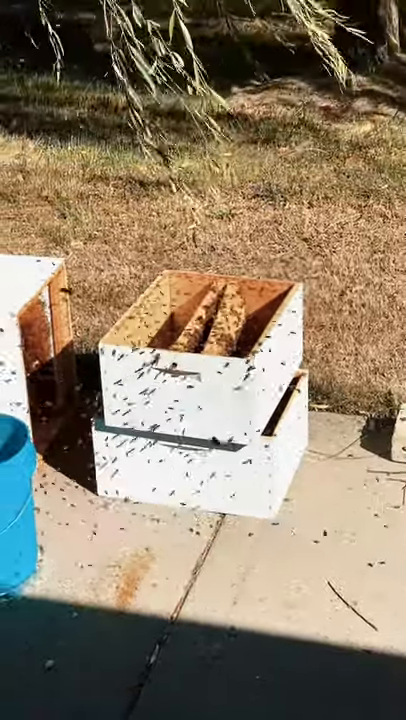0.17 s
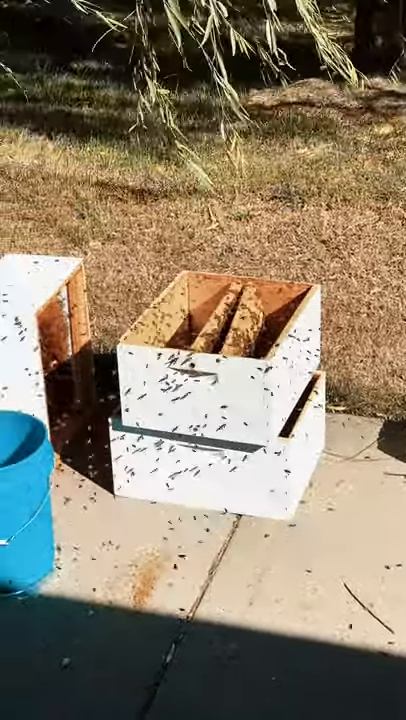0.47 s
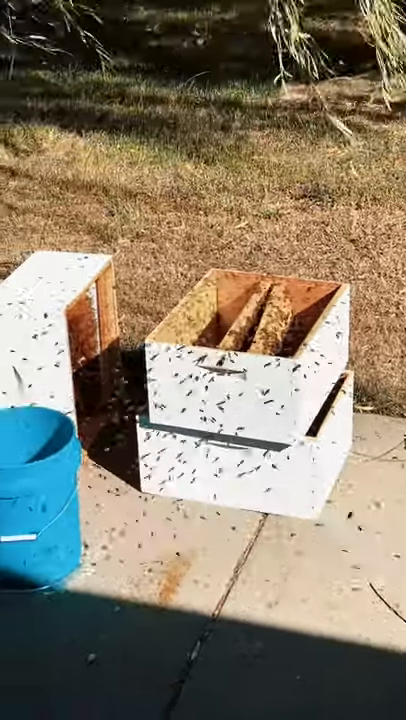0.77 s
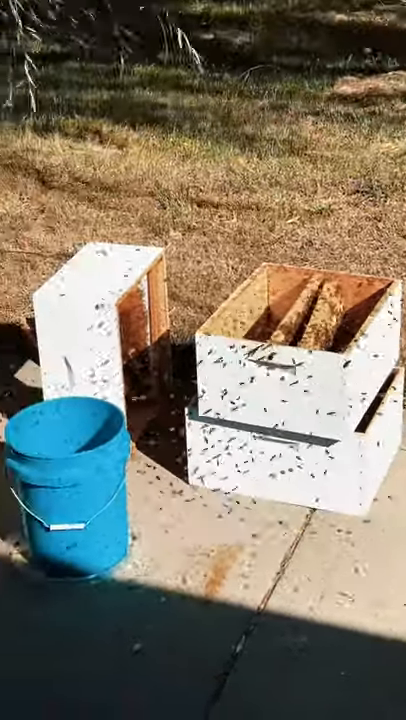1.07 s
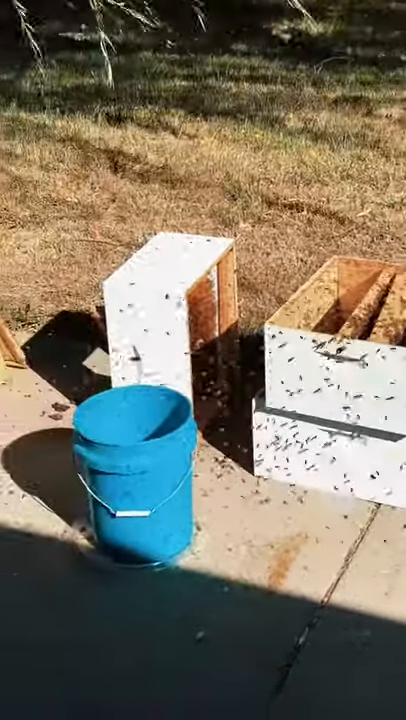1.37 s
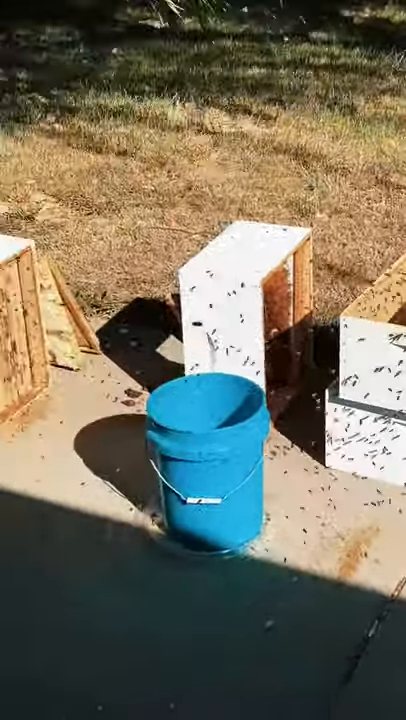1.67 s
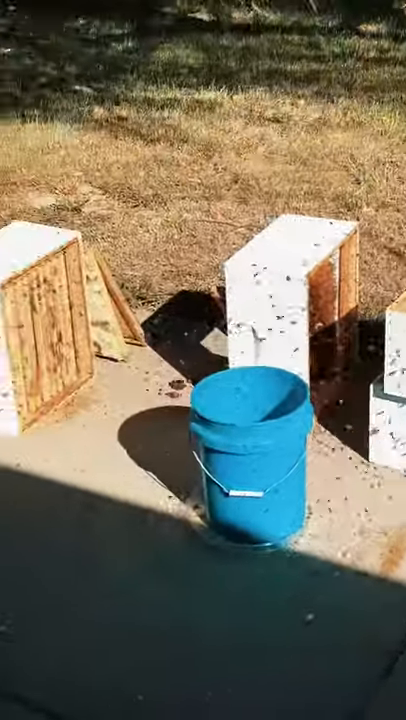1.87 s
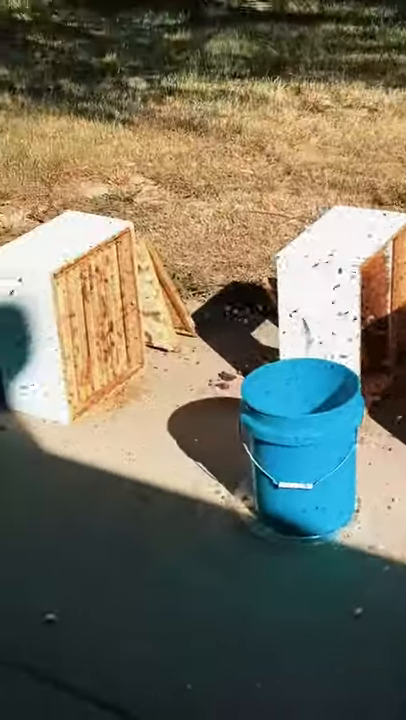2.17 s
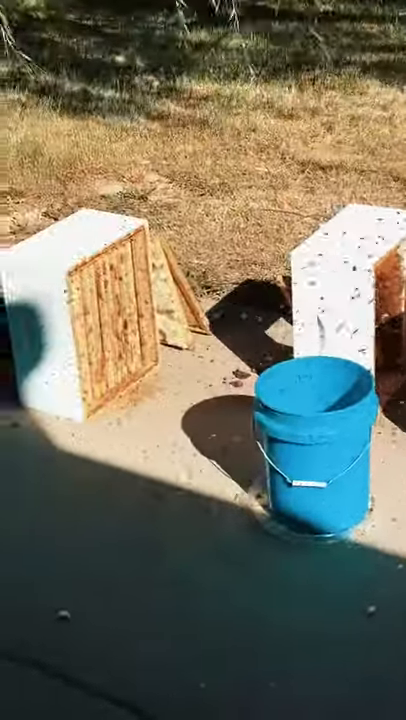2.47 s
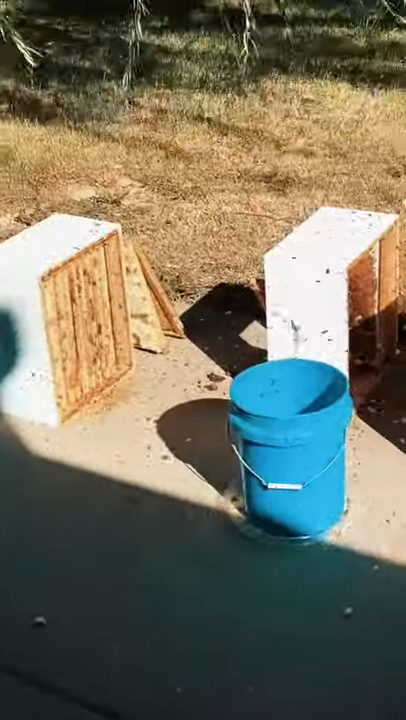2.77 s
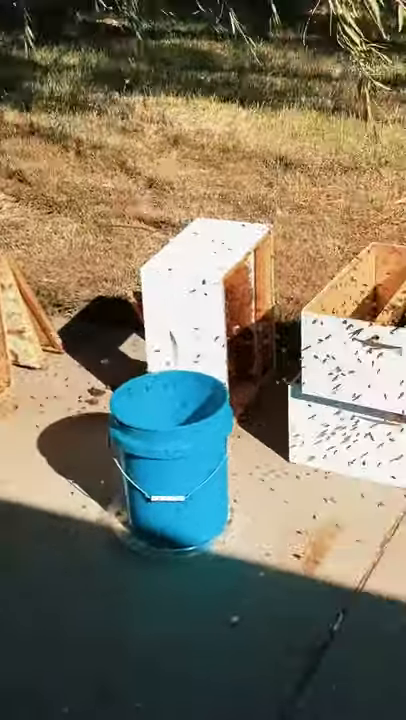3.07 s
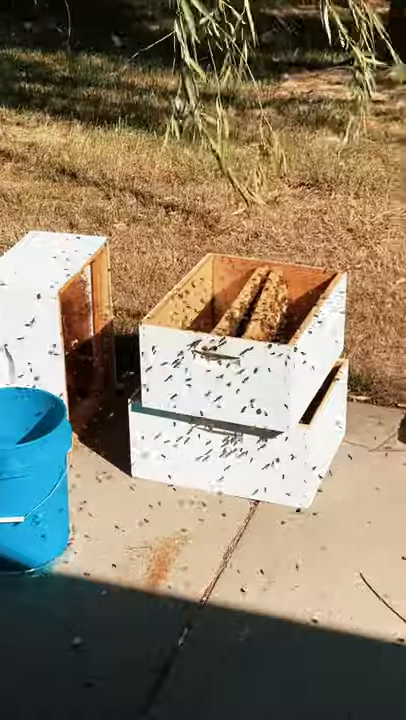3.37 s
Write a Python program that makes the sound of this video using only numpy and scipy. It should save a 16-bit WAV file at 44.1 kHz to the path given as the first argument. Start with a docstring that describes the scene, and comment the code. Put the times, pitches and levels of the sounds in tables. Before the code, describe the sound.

Many honeybees blend into a steady, low, slightly rough hum for about 3.5 seconds, each wavering in pitch. Single bees briefly swell and glide nearby; the nearest buzz grows more prominent from about 1.3 seconds and is strongest near the end. A soft outdoor hiss stays underneath. Low wind rumbles and thumps the microphone early, most strongly at 1.5-2.1, eases around 2.3-2.8, then returns from 2.9.

```python
"""A cloud of honeybees flies around an open hive in a yard: harmonic wingbeats near 255 Hz wander
and blend into one hum. From it the nearest bees swell and glide; a delayed copy of each wing tone
is its echo off the concrete below, which makes the harmonics come and go.
Behind them lies a steady outdoor hiss of coloured noise. Soft gusts rumble and flutter on the
microphone as noise of varying level, and single eddies thump it as brief tones falling in pitch."""
import sys
import numpy as np
from scipy.fft import rfft, irfft, next_fast_len
from scipy.io import wavfile
from scipy.ndimage import map_coordinates

SR = 44100
rng = np.random.default_rng(int(sys.argv[2]) if len(sys.argv) > 2 else 0)


def wav_out(sig):
    """Save sig, one row per channel (or a flat mono array), as 16-bit PCM at SR to the path in sys.argv[1]."""
    wavfile.write(sys.argv[1], SR, np.round(np.clip(np.atleast_2d(sig).T, -1, 1) * 32767).astype(np.int16))


N = 154791

# Harmonics of a wing stroke: (harmonic number, relative level [dB])
WING_HARMONICS = [(1, -3), (2, 1), (3, -5), (4, -7), (5, -7.5), (6, -11.5), (7, -14.5), (9, -21), (13, -25),
                  (20, -24.5)]
# Level of the swarm's main group: (time [s], level [dB])
SWARM_LEVEL = [(0, -50.5), (.5, -50), (1.2, -51), (1.85, -51), (2.4, -50), (2.9, -51), (3.5, -50.5)]
# The nearest bee as it circles: (time [s], wingbeat [Hz], relative level [dB])
NEAREST_PATH = [(0, 257, -60), (.2, 263.5, -59), (0.361, 259.2, -57), (.55, 253.8, -60), (.72, 261.6, -56),
                (.9, 255, -66), (1.1, 243.3, -59), (1.2, 251.8, -58), (1.28, 256.1, -51.5),
                (1.35, 255.4, -58), (1.42, 262, -52.5), (1.62, 252.6, -57), (1.73, 248.9, -50.5),
                (1.85, 255, -52.5), (1.92, 250.8, -51), (1.98, 262.4, -54), (2.08, 254.8, -56),
                (2.219, 254.3, -52), (2.35, 258.6, -55.5), (2.45, 247, -58), (2.54, 258.1, -50.5),
                (2.66, 274.3, -64), (2.76, 259, -52.5), (2.93, 247, -54), (3.11, 253.3, -58),
                (3.219, 258.2, -63), (3.3, 264, -48.5), (3.38, 258.6, -50.5), (3.45, 247, -56),
                (3.5, 250, -46)]
# Single bees that fly close by:
# (time [s], level [dB], wingbeat [Hz], glide at the middle [Hz/s], half length [s])
CLOSE_PASSES = [(.16, -58, 251.5, -23, 0.044), (0.333, -55.5, 276, 40.5, .05),
                (0.409, -54, 229.2, -18.5, 0.078), (0.627, -63, 217, 90, 0.047),
                (.66, -56, 269.4, 20.5, 0.057), (0.845, -53, 234.5, -32, 0.028),
                (1.035, -58, 257.7, 30, .05), (1.154, -55, 271, 40, 0.036),
                (1.981, -63, 279.5, 29.5, 0.099), (2.189, -61, 241.5, -89, .05),
                (2.54, -52, 245.7, 60, .04), (2.691, -56, 252, -40, .05), (2.95, -58, 233, 30.5, .05),
                (3.379, -59, 274.2, 40.5, 0.027), (3.491, -56.5, 264.5, -60, 0.044)]
# Spectral density of the outdoor hiss: (frequency [Hz], relative level per Hz [dB])
HISS_SPECTRUM = [(20, -35), (120, 7), (220, 13.5), (350, 8.5), (650, 3.5), (1300, 6), (2100, -1),
                 (3200, -0.5), (4200, -4), (6500, -4.5), (10500, -4.5), (12500, -7), (15500, -17)]
# Level of the outdoor hiss: (time [s], level [dB])
HISS_COURSE = [(0, -51), (1.1, -49.5), (2, -51), (2.8, -51.5), (3.5, -52)]
# Level of the wind rumble in gusts: (time [s], level [dB])
GUST_LEVEL = [(0, -41), (.25, -51.5), (.31, -40), (.47, -46), (.62, -42.5), (.9, -48.5), (1.38, -53.5),
              (1.5, -41.5), (1.6, -35.5), (1.74, -42.5), (1.82, -42), (1.9, -42), (2.07, -38), (2.13, -50),
              (2.24, -49), (2.33, -63), (2.62, -58), (2.68, -55.5), (2.8, -54.5), (2.89, -45),
              (3.08, -40.5), (3.18, -44.5), (3.25, -45.5), (3.39, -48.5), (3.5, -34.5)]
# Spectral density of the wind rumble: (frequency [Hz], relative level per Hz [dB])
RUMBLE_SPECTRUM = [(15, -48), (30, -22), (45, -2.5), (62, -0.5), (110, -7), (170, -15.5), (260, -23.5),
                   (400, -39), (900, -96)]
# Single eddies that thump the microphone: (time [s], relative peak [dB], pitch at the peak [Hz])
EDDY_THUMPS = [(.297, -33.5, 114), (.316, -33.5, 80), (0.375, -37.5, 67), (.536, -32, 57.5),
               (0.597, -29.5, 63), (0.642, -36, 72), (.668, -30.5, 71), (.736, -33.5, 76),
               (0.857, -37, 63.5), (1.566, -26, 88), (1.579, -20, 143), (1.607, -30, 70.7),
               (1.628, -31, 64.86), (1.692, -35, 129), (1.796, -28.5, 144), (1.805, -29, 80.3),
               (1.849, -24, 94.5), (1.95, -28, 62.7), (1.973, -30.5, 78), (2.042, -25, 140),
               (2.064, -25.5, 77), (2.195, -33, 92.05), (2.237, -36, 89.46), (2.888, -33, 92),
               (3.049, -31, 98.3), (3.077, -29.5, 67), (3.229, -25, 210), (3.242, -36, 72),
               (3.305, -31, 90), (3.458, -31, 141), (3.476, -28, 82.7)]
# Likeness of the field at the two microphone ports: (frequency [Hz], likeness [0-1])
PORT_LIKENESS = [(200, .98), (420, .9), (570, .78), (660, .3), (1000, .62), (1130, .4), (1350, .62),
                 (1800, .98), (2300, .87), (3700, .93), (4500, .8), (4900, .92), (5050, .75), (5400, .98),
                 (6300, .76), (11000, .75), (12500, .99)]
# Level difference of the ports: (frequency [Hz], left minus right [dB])
PORT_BALANCE = [(400, 0.5), (520, 1.3), (640, 9.5), (790, 8), (1020, 3.5), (1300, 5.5), (1600, 0.5),
                (1800, 0)]
# Phase difference of the ports: (frequency [Hz], lead of the left [rad])
PORT_LEAD = [(60, -.05), (330, -.12), (600, .95), (740, .15), (1300, -.05), (2000, .08), (2550, 1.15),
             (3700, .1), (4150, .3), (4700, 1.7), (4900, 3.1), (5150, 0), (5650, .05), (8000, 1.5),
             (11000, 2.3), (12500, 3.1)]

WINGBEAT_HZ, SPREAD_HZ = 258.1, 8  # the main group's mean wingbeat, and how its bees differ
SLOW_BEES_HZ, SLOW_BEES_DB = 222.1, -5.5  # hoverers with slower wings, relative to the main group
WANDER_HZ, WANDER_PER_S = 14, 8  # each bee speeds up and slows as it steers
PASS_DB, PASS_PER_S = 4, 6.024  # each bee swells and fades as it comes and goes
FLUTTER_HZ, FLUTTER_PER_S = 3.3, 35  # quick unsteadiness of the wings
ECHO_GAIN, ECHO_S = 0.48, 0.002999  # the echo off the concrete: gain and mean delay
ECHO_DRIFT_S, ECHO_PER_S = 0.000602, 3  # its delay shifts as a bee changes height
NEAREST_DB = -1.5  # added to the nearest bee's relative level
SWERVE_HZ, SWERVE_PER_S = 3.5, 22  # how the pitch of close bees swerves
PORT_DB = -21  # the part of the rumble that each port feels alone, relative to the shared part
GUST_FLUTTER_DB, GUST_FLUTTER_PER_S = 2.0, 21.72
EDDY_CYCLES, EDDY_SAG = 0.71, 0.3  # half length in cycles, rate of pitch decay per half length
EDDY_DB, EDDY_LAG_S = 0.5, 0.00017  # added to each peak; an eddy reaches the left port first
TOP_HZ = 15800


def swarm(count=12, slow_count=4):
    """Superposition: many detuned wing tones blend into one hum, direct and diffuse."""
    ranks = (np.arange(count) + .5) / count
    # Evenly spaced ranks of a logistic distribution crowd the bees around the mean
    beats = WINGBEAT_HZ + SPREAD_HZ * np.log(ranks / (1 - ranks)) / 2
    main_group = hum(beats)
    slow_group = amp(SLOW_BEES_DB) * hum([SLOW_BEES_HZ] * slow_count)
    return (main_group + slow_group) * amp(curve(SWARM_LEVEL))


def hum(rates):
    """Incoherent addition: separate bees make up the direct and the diffuse sound."""
    return np.array([unit(sum(bee(hz) for hz in rates)) for part in range(2)])


def bee(beat_hz):
    """Frequency and amplitude modulation: a bee's tone wanders as it steers, nears and leaves."""
    tone = wings(beat_hz + WANDER_HZ * wobble(WANDER_PER_S))
    return tone * amp(PASS_DB * wobble(PASS_PER_S))


def wings(hz, order=20, size=1024):
    """Fourier synthesis and comb filtering: a periodic stroke interferes with its ground echo."""
    harmonics = np.arange(1, order + 1)
    phases = np.exp(2j * np.pi * rng.random(order))
    stroke = unit(irfft(np.r_[0, amp(along(WING_HARMONICS, harmonics)) * phases], size))
    turns = np.cumsum(hz + FLUTTER_HZ * wobble(FLUTTER_PER_S)) / SR
    delay = ECHO_S + ECHO_DRIFT_S * wobble(ECHO_PER_S)

    def play(cycles):
        """Periodicity: every whole cycle repeats the same stroke."""
        return np.interp(cycles % 1, np.arange(size) / size, stroke)

    direct = play(turns)
    echo = play(turns - hz * delay)  # a delay sets the wing cycle back
    return unit(direct + ECHO_GAIN * echo)


def nearest_bee():
    """Modulation of a direct tone: the nearest bee's buzz rises and falls as it circles."""
    s, hz, db = np.transpose(NEAREST_PATH)
    beat = curve(np.c_[s, hz]) + SWERVE_HZ * wobble(SWERVE_PER_S)
    direct = amp(NEAREST_DB + curve(np.c_[s, db])) * wings(beat)
    return np.array([direct, np.zeros(N)])


def flybys():
    """Gaussian envelopes: a close bee swells out of the hum, glides in pitch and fades back."""
    direct = np.zeros(N)
    for s, db, hz, glide, length in CLOSE_PASSES:
        u = (np.arange(N) / SR - s) / length
        glided = hz + glide * length * 2 * np.tanh(u / 2)  # the glide levels off at both ends
        beat = glided + SWERVE_HZ * wobble(SWERVE_PER_S)
        direct += amp(db) * wings(beat) * np.exp(-u ** 2 / 2)
    return np.array([direct, np.zeros(N)])


def outdoor_hiss():
    """Filtered random noise: a steady broadband hiss, direct and diffuse."""
    return amp(curve(HISS_COURSE)) * noise(HISS_SPECTRUM, channels=2)


def wind():
    """Turbulent pressure on the microphone: gusts rumble and eddies thump."""
    return gusts() + eddies()


def gusts():
    """Amplitude-modulated noise: the rumble is nearly alike at both ports and flutters."""
    shared = noise(RUMBLE_SPECTRUM, channels=1)
    rumble = shared + amp(PORT_DB) * noise(RUMBLE_SPECTRUM, channels=2)
    fluttering = unit(rumble * amp(GUST_FLUTTER_DB * wobble(GUST_FLUTTER_PER_S)))
    return fluttering * amp(curve(GUST_LEVEL))


def eddies():
    """Transient wave packets: each eddy is a brief thump that falls in pitch."""
    thumps = np.zeros((2, N))
    port_time = np.arange(N) / SR + EDDY_LAG_S * np.array([[.5], [-.5]])
    for s, db, hz in EDDY_THUMPS:
        u = np.clip((port_time - s) * hz / EDDY_CYCLES, -5, 5)  # time in half lengths
        cycles = EDDY_CYCLES * (1 - np.exp(-EDDY_SAG * u)) / EDDY_SAG
        tone = np.sin(2 * np.pi * (cycles + rng.random()))
        thumps += amp(db + EDDY_DB) * np.exp(-u ** 2) * tone
    return thumps


def ports(pair):
    """Spatial coherence: direct and diffuse sound form one field at the left and right ports."""
    def shares(hz):
        """Power conservation: cosine and sine divide the field into direct and diffuse."""
        turn = np.arccos(np.clip(along(PORT_LIKENESS, hz), 0, 1)) / 2
        return np.array([np.cos(turn), np.sin(turn)])

    half = np.array([[.5], [-.5]])  # each port takes half of a difference

    def differences(hz):
        """Interaural-type cues: the ports differ in level and phase."""
        return amp(half * along(PORT_BALANCE, hz)) * np.exp(1j * half * along(PORT_LEAD, hz))

    mid, side = filtered(pair, shares)
    return filtered(np.array([mid + side, mid - side]), differences)


def noise(spectrum, channels):
    """Spectral shaping: white noise becomes unrelated coloured noises, together of rms 1."""
    return unit(filtered(rng.standard_normal((channels, N)), lambda hz: amp(along(spectrum, hz))))


def filtered(x, response):
    """Convolution theorem: the spectrum of x times a complex response of frequency."""
    m = next_fast_len(N + SR // 2)
    return irfft(rfft(x, m) * response(np.fft.rfftfreq(m, 1 / SR)), m)[..., :N]


def wobble(rate, size=1024):
    """Band-limited randomness: a smooth random curve with rate knots a second."""
    s = np.linspace(0, N / SR, size)
    coarse = map_coordinates(rng.standard_normal(size), [(s * rate + rng.random())], mode="wrap")
    return np.interp(np.arange(N) / SR, s, coarse)


def curve(rows):
    """Linear interpolation in time: read (time [s], value) points at every sample."""
    return np.interp(np.arange(N) / SR, *np.transpose(rows))


def along(points, hz):
    """Logarithmic interpolation: read (frequency or harmonic, value) points on a log axis."""
    f, v = np.transpose(points)
    return np.interp(np.log(hz + 1), np.log(f + 1), v)


def amp(db):
    """The decibel law: level to amplitude gain."""
    return 10 ** (np.asarray(db) / 20)


def unit(x):
    """Power normalisation: scale to rms 1."""
    return x / np.sqrt(np.mean(x ** 2) + 1e-20)


def scene():
    """Linear superposition: bees and hiss surround the microphone; the wind blows on it."""
    return ports(swarm() + nearest_bee() + flybys() + outdoor_hiss()) + wind()


def record(dry):
    """Band limitation: the recorder keeps nothing from its upper limit on."""
    return filtered(dry, lambda hz: hz < TOP_HZ)


dry = scene()
out = record(dry)
wav_out(out)
```